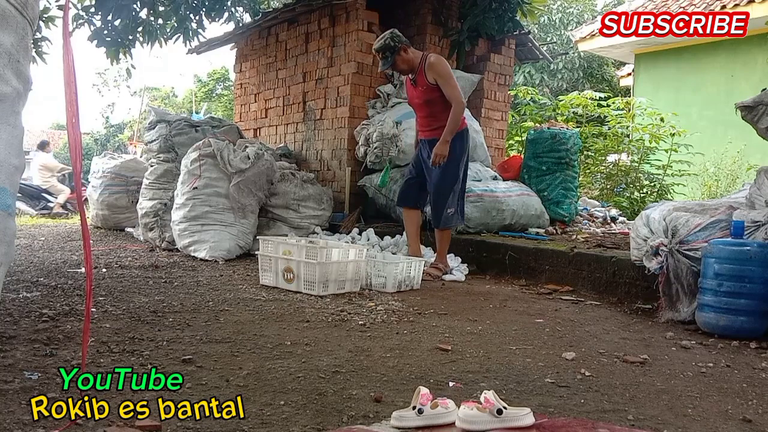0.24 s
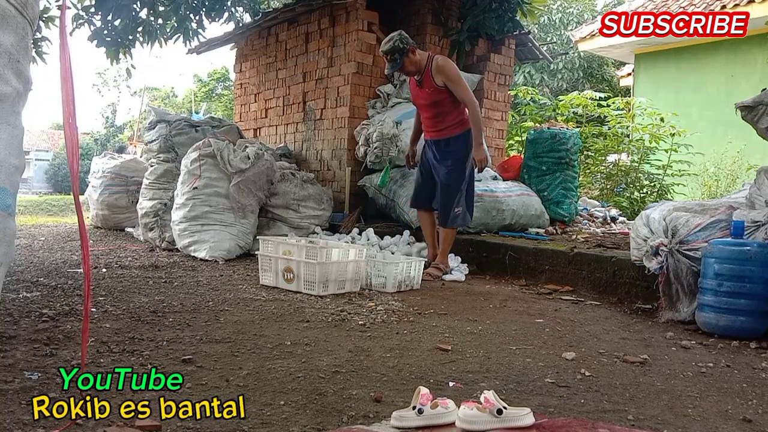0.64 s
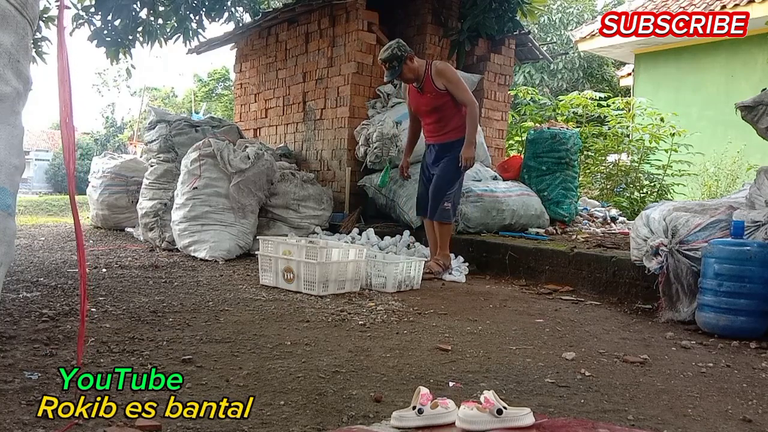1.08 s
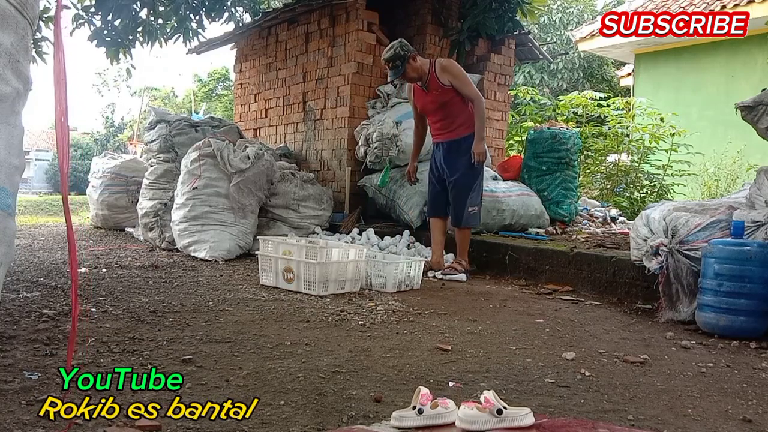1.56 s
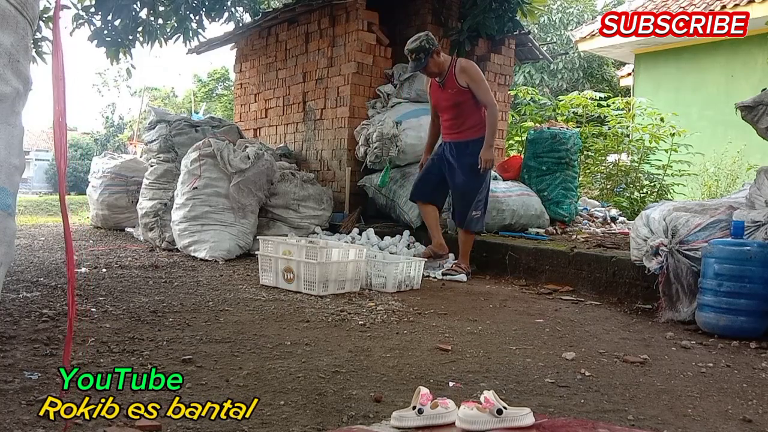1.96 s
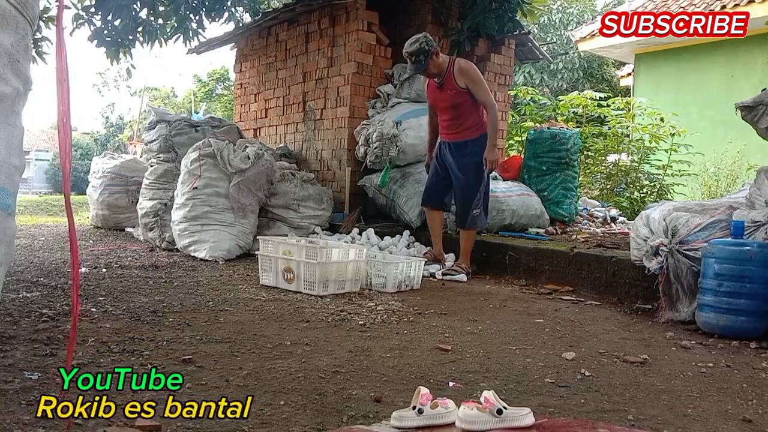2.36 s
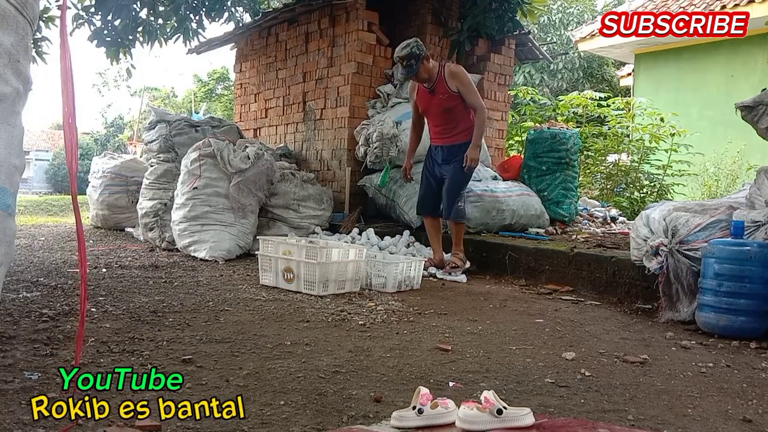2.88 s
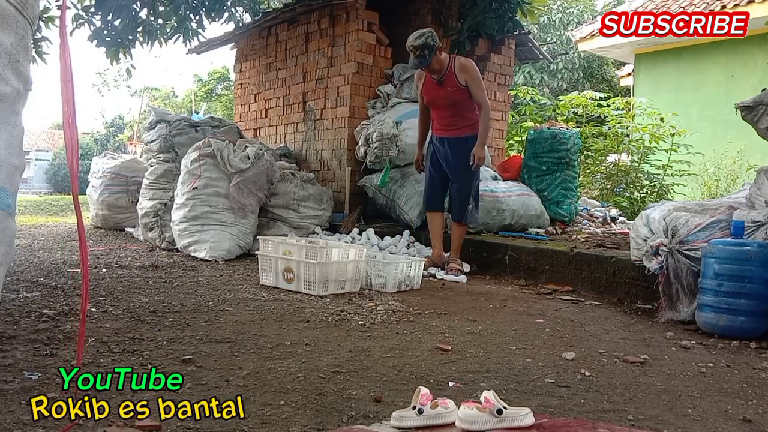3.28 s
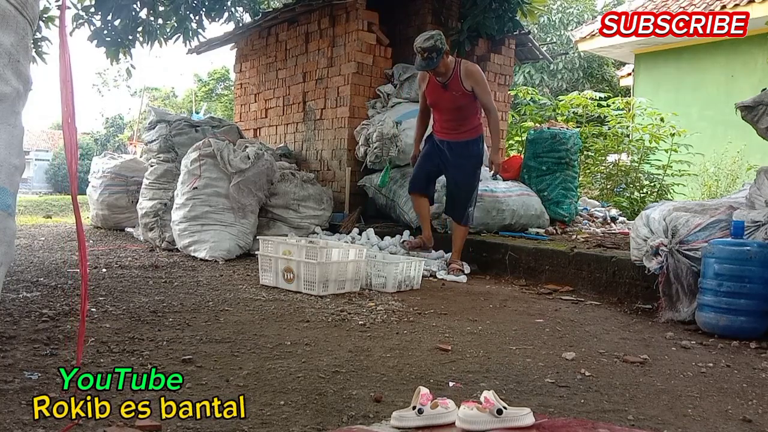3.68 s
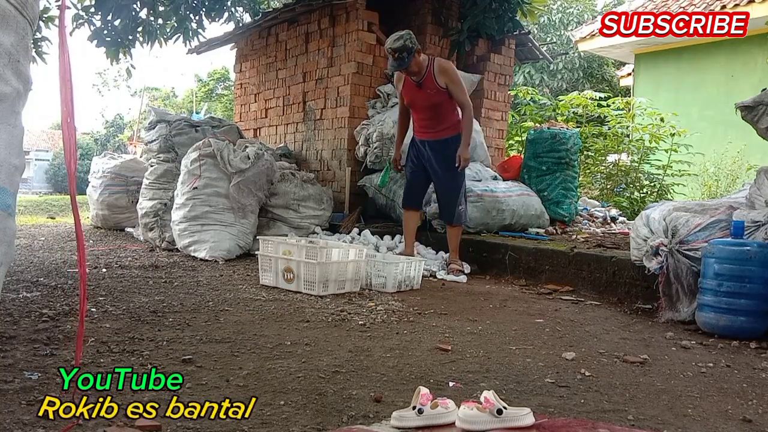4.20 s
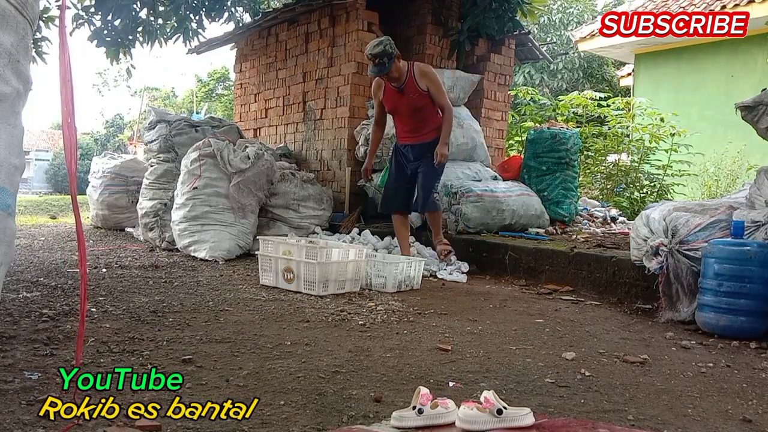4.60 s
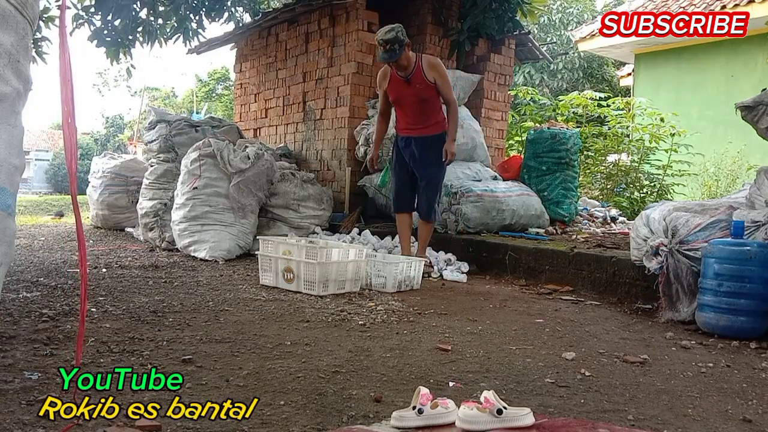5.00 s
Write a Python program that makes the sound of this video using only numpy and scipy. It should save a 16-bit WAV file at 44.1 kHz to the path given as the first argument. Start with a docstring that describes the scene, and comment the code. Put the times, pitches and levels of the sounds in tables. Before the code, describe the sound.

Repeated footsteps crush empty plastic bottles in sharp, crackling bursts in an open yard, with a faint pulsing engine hum.

```python
"""Empty plastic bottles are trampled flat in an open yard; a wall returns short echoes.
From the start a small engine idles far off, slowly fading, over a murmur of air and traffic.
Each tread buckles the bottle walls in sharp snaps over dense crackle; the squeezed air groans.
From 0.9 s, between treads, bottles draw air back in with dull hoots.
The hardest snap comes at 2.9 s, the last burst near 5 s."""
import sys
import numpy as np
from scipy import signal
from scipy.fft import rfft, irfft
from scipy.io import wavfile
from scipy.ndimage import uniform_filter1d, minimum_filter1d

SR = 44100
rng = np.random.default_rng(int(sys.argv[2]) if len(sys.argv) > 2 else 0)


def waveform_to_disk(signal):
    """Save audio, clipped to [-1, 1], as 16-bit WAV at the path in sys.argv[1]."""
    frames = np.transpose(np.atleast_2d(signal))
    scaled = np.clip(frames, -1, 1) * 32767
    samples = np.round(scaled).astype(np.int16)
    wavfile.write(sys.argv[1], SR, samples)


N = 231170

# wall buckles: (time [s], panel level [dB], panel pitch [Hz], crack level [dB], crack spectral peak [Hz])
BUCKLES = [(0.015, -39, 1400, -66, 4170), (0.039, -42, 1390, -34, 4220), (0.068, -25, 740, -39, 3830),
           (0.106, -22.5, 590, -21.5, 3860), (0.142, -27.5, 750, -22, 3820),
           (0.153, -34, 1350, -20.5, 3450), (0.166, -18.5, 1590, -24, 3610), (0.191, -13, 736, -16, 4540),
           (0.216, -9.5, 694, -21.5, 3340), (0.239, -18, 1080, -14.5, 3770),
           (0.293, -37.5, 1440, -28.5, 4000), (0.303, -41, 950, -28, 3870), (0.344, -25.5, 1340, -30, 4520),
           (0.359, -11, 670, -13.5, 3950), (0.374, -12.5, 1770, -20, 4590), (0.384, -18, 1400, -32, 3780),
           (0.429, -10.5, 1340, -40, 3840), (0.442, -21.5, 703, -19.5, 3660),
           (0.614, -29.5, 1830, -24, 3870), (0.744, -31, 1550, -25, 4160),
           (0.753, -19.5, 1600, -17.5, 4310), (0.772, -18, 1510, -16, 5030), (0.795, -13, 750, -9, 4200),
           (0.808, -12, 1260, -13, 3840), (0.819, -16, 890, -10, 3960), (0.837, -27, 735, -45, 4250),
           (0.87, -28.5, 710, -22, 4300), (0.977, -43, 1080, -40.5, 3850), (1.021, -43, 1200, -50, 3420),
           (1.093, -33, 1100, -37.5, 4200), (1.118, -19.5, 1124, -37, 3530),
           (1.154, -26.5, 1880, -30, 4800), (1.176, -13.5, 1650, -22, 4290),
           (1.196, -9.5, 1770, -15.5, 3850), (1.225, -16.5, 1650, -18, 3600),
           (1.237, -11.5, 840, -25, 3760), (1.25, -2, 940, -12.5, 3270), (1.373, -46, 1185, -44, 3420),
           (1.589, -23, 1110, -24, 3110), (1.634, -35, 1080, -62, 3390), (1.662, -27, 1110, -28.5, 3100),
           (1.732, -46, 1830, -42.5, 3240), (1.781, -20, 1390, -31.5, 3280),
           (1.842, -26.5, 1280, -36, 3920), (1.848, -18.5, 1660, -36, 3940),
           (1.877, -25.5, 1150, -35, 3540), (1.923, -26, 1320, -19.5, 3630), (1.963, -20, 1430, -26, 3700),
           (1.97, -14.5, 1410, -29, 3880), (1.98, -6.5, 1800, -12, 4360), (1.987, -17, 860, -47, 3170),
           (2.038, -16, 1870, -24.5, 4310), (2.068, -22.5, 1890, -18.5, 4600),
           (2.087, -14, 1410, -56, 3970), (2.311, -21, 620, -43, 3840), (2.319, -24, 616, -21.5, 4150),
           (2.35, -10, 1530, -22, 4290), (2.361, -10, 1610, -15, 3930), (2.4, -30, 716, -44, 3810),
           (2.419, -10, 714, -16, 3440), (2.437, -8.5, 1640, -32, 3730), (2.47, -26, 797, -23, 3700),
           (2.486, -5.5, 1690, -13.5, 4220), (2.5, -17, 706, -25.5, 3030), (2.525, -22, 890, -22.5, 4340),
           (2.535, -14.5, 1570, -38, 3730), (2.566, -20, 1390, -26, 3800), (2.607, -32.5, 620, -35, 3980),
           (2.629, -29.5, 1210, -35, 4150), (2.649, -18.5, 950, -64, 3310), (2.669, -20.5, 900, -35, 3140),
           (2.739, -25, 690, -36, 3780), (2.751, -10.5, 896, -20.5, 3900), (2.785, -17.5, 1630, -22, 7150),
           (2.822, -22, 1640, -17, 3660), (2.855, -49, 1350, -35, 4020), (2.875, -15.5, 1400, -19.5, 4100),
           (2.895, -10.5, 1820, -19, 3000), (2.919, -5.5, 1590, -12, 4240), (2.926, 1.5, 788, 2, 3600),
           (2.938, -8.5, 1580, -14, 4150), (2.947, -13, 1080, -17, 3780), (2.959, -11.5, 750, -19, 3550),
           (2.968, -7, 1470, -9.5, 3640), (2.982, -14, 1460, -11.5, 4000), (3.008, -24.5, 668, -14, 3860),
           (3.049, -9, 1710, -19, 3410), (3.068, -30.5, 1150, -18, 3650), (3.187, -30.5, 1320, -17.5, 4300),
           (3.204, -32.5, 715, -18.5, 4050), (3.218, -13.5, 730, -16, 3250), (3.229, -16, 690, -18, 3640),
           (3.251, -11.5, 650, -8.5, 3720), (3.269, -14, 1040, -43, 3770), (3.277, -23, 697, -19, 3300),
           (3.292, -21, 1020, -29, 3660), (3.318, -21.5, 790, -23.5, 3220), (3.338, -15, 1020, -12.5, 3420),
           (3.349, -14, 1030, -42, 3360), (3.382, -37, 980, -21, 4000), (3.396, -33.5, 1190, -17.5, 3220),
           (3.409, -29, 1290, -20.5, 3500), (3.443, -10, 730, -13, 4150), (3.451, -13.5, 606, -17.5, 3650),
           (3.469, -13.5, 1030, -19, 3760), (3.484, -9.5, 1240, -15.5, 4060),
           (3.496, -16.5, 790, -33, 3900), (3.509, -14.5, 1140, -12, 3560), (3.523, -20, 1000, -36, 2970),
           (3.547, -10.5, 1670, -13, 3100), (3.557, -13.5, 1500, -10.5, 3050), (3.574, -21, 638, -18, 4800),
           (3.657, -20, 1290, -19.5, 3470), (3.674, -19, 730, -51, 4050), (3.71, -25, 1420, -34.5, 3100),
           (3.856, -40.5, 1110, -63, 3110), (3.873, -38, 1120, -54, 3210), (3.902, -16.5, 1670, -17, 3830),
           (3.92, -19, 730, -39, 2800), (3.939, -21.5, 1210, -43, 4720), (3.96, -20, 1370, -16, 6800),
           (3.971, -22.5, 614, -22, 3630), (4.006, -20, 1500, -19, 3120), (4.017, -7, 1560, -18, 4100),
           (4.045, -12.5, 1570, -21, 3160), (4.069, -11.5, 730, -17.5, 3600),
           (4.086, -10, 1640, -10.5, 2820), (4.109, -15.5, 1240, -41, 4360), (4.119, -17, 1360, -16, 3870),
           (4.135, -18.5, 1540, -29, 3360), (4.153, -26, 810, -13.5, 4140), (4.17, -9, 1230, -15.5, 3240),
           (4.184, -12.5, 660, -20.5, 3710), (4.206, -16.5, 1560, -17.5, 3510),
           (4.234, -12.5, 1250, -15.5, 3770), (4.256, -11.5, 1060, -20.5, 3800),
           (4.269, -24.5, 1060, -23, 3640), (4.307, -18.5, 666, -21, 4300), (4.335, -24.5, 910, -34, 4140),
           (4.363, -16.5, 840, -25, 4160), (4.387, -21, 676, -25.5, 3550), (4.399, -24, 690, -21, 4670),
           (4.421, -10, 1550, -17.5, 3860), (4.455, -12.5, 797, -20, 3400), (4.477, -18.5, 1650, -22, 4740),
           (4.5, -17.5, 2200, -13.5, 4170), (4.534, -15, 780, -13, 4160), (4.549, -15, 980, -11.5, 3660),
           (4.557, -0.5, 1580, -21, 4690), (4.571, -14, 650, -40, 4240), (4.592, -9.5, 810, -11, 3350),
           (4.605, -10.5, 770, -36, 3330), (4.617, -13.5, 627, -16, 3650), (4.643, -5.5, 1046, -11.5, 3400),
           (4.66, -21, 1470, -30, 3740), (4.678, -34, 1120, -24.5, 4240), (4.713, -33.5, 586, -49, 2800),
           (4.778, -43, 1450, -65, 3300), (4.807, -47, 595, -45.5, 3880), (4.844, -56, 637, -49, 3930),
           (4.958, -24.5, 764, -41, 3500), (4.972, -20.5, 746, -25, 3580), (4.99, -9, 1580, -21, 3970),
           (4.996, -10.5, 920, -16.5, 3350), (5.011, -19, 1560, -10, 3770), (5.025, -19, 894, -15.5, 3280),
           (5.037, -16.5, 2080, -25, 4260), (5.07, -38, 920, -26, 3630), (5.113, -21.5, 1550, -28.5, 3400),
           (5.146, -17.5, 860, -45, 3220), (5.157, -25, 780, -29, 3170), (5.23, -27, 766, -34, 3600)]
# foot crushes: (start [s], length [s], panel crackle [dB], crease crackle [dB], air cavity [dB])
TREADS = [(0.062, 0.041, -54, -61, -44.5), (0.103, 0.14, -35.5, -46.5, -58.5),
          (.355, 0.044, -30.5, -37.5, -44.5), (0.631, 0.027, -56.5, -57, -71),
          (0.763, 0.077, -22.5, -34, -29.5), (0.856, 0.079, -43.5, -56, -37.5),
          (0.682, 0.067, -64, -73.5, -59), (0.957, 0.11, -64, -66.5, -62), (1.045, 0.1, -48, -65, -54.5),
          (1.16, 0.11, -33, -48.5, -48.5), (1.588, 0.079, -50.5, -53, -66.5), (1.78, 0.16, -54.5, -64, -79),
          (1.92, 0.17, -37.5, -49, -85), (2.285, 0.038, -41, -67, -43.5), (2.316, 0.089, -28, -40.5, -27),
          (2.425, .15, -37, -48.5, -44.5), (2.655, 0.024, -42.5, -56, -42.5), (2.743, 0.017, -31, -57, -42),
          (2.887, .11, -35, -45, -33), (3.0, 0.064, -35.5, -45.5, -42), (3.206, 0.067, -29.5, -38.5, -30.5),
          (3.348, 0.23, -32, -43.5, -37), (3.648, 0.035, -40, -53, -43.5), (3.839, 0.037, -60, -80, -69),
          (3.909, 0.41, -34, -48.5, -36), (4.062, 0.24, -33, -52, -37.5), (4.361, 0.15, -34, -45, -37.5),
          (4.537, 0.11, -27, -33.5, -35), (4.968, 0.056, -28, -52.5, -41.5), (5.086, 0.1, -51, -56.5, -54),
          (5.226, .03, -41.5, -61, -68)]
# crackle colour through the microphone: (frequency [Hz], level [dB])
CRACKLE_SPECTRUM = [(750, -1), (1000, -4), (1600, -1), (2650, -16), (3700, -9.5), (4800, -12.5),
                    (5900, -19.5), (7000, -19), (9600, -28), (15000, -32)]
# air drawn back in: (start [s], length [s], pitch [Hz], level [dB])
NECK_HOOTS = [(0.917, 0.065, 406, -40.5), (1.054, 0.026, 408, -42), (2.111, 0.063, 428, -48),
              (2.155, 0.047, 407, -53), (3.089, 0.12, 364.3, -45.5), (4.694, 0.061, 449, -45.5),
              (4.79, 0.092, 453.4, -51.5)]
# echo decay: (frequency [Hz], T60 [s])
ECHO_DECAY = [(300, 0.12), (1000, 0.13), (4000, 0.046), (12000, 0.14)]
# idling engine: (time [s], firings so far [count])
FIRING_COUNT = [(-.026, 0), (.671, 10), (1.022, 15), (2.263, 33), (2.741, 40), (3.742, 55), (4.781, 70),
                (5.268, 77)]
# exhaust pipe resonances: (frequency [Hz], gain [dB], T60 [s])
EXHAUST_MODES = [(80, -9.5, 0.07), (105, -8, 0.14), (126, -2, 0.14), (137, -2, 0.1)]
# air and traffic: (frequency [Hz], level [dB])
YARD_SPECTRUM = [(25, -24.5), (60, -10), (137, -11), (218, -17), (700, -22), (1600, -39.5), (3700, -33),
                 (9000, -53), (14000, -66.5)]


def snaps(rise_s=0.00024, slip_s=0.0044, panel_cycles=15.1, body_db=5.5, mic_peak_db=5,
          sizzle_hz=7080, sizzle_db=-5):
    """A ragged slip rings a panel and gives a bright crack, coloured near 3.8 kHz by the microphone."""
    size = 2048
    out = np.zeros(N + size)
    t = np.arange(size) / SR
    slip = (1 - np.exp(-t / rise_s)) ** 2 * np.exp(-(t / slip_s) ** 1.67)
    for time_s, panel_db, panel_hz, crack_db, peak_hz in BUCKLES:
        rough, fine = rng.standard_normal((2, size))
        jerks = rough ** 3 * slip  # a few strong among many weak
        panel = ring(jerks, panel_hz, panel_cycles / panel_hz)
        panel += from_db(body_db) * band(jerks, panel_hz / 3.2, panel_hz * 1.42)  # nearby panels
        panel = band(panel, panel_hz / 2, panel_hz * 3.13)  # soft panel: little bass or treble
        panel = band(panel, panel_hz / 2.6, 16000)
        spray = band(coloured(fine, CRACKLE_SPECTRUM), 2600, 20000) * slip
        top_hz = 19000 * from_db(0.32 * min(crack_db, 0))  # weak slips are duller
        spray = band(spray, 2000, max(top_hz, 4000))
        crack = spray + from_db(mic_peak_db) * band(spray, peak_hz / 1.12, peak_hz * 1.12)
        film_gain = from_db(sizzle_db) * fine[1] ** 2  # thin film rings high, varying by snap
        crack += film_gain * band(spray, sizzle_hz / 1.06, sizzle_hz * 1.06)
        i = round(time_s * SR)
        out[i:i + size] += from_db(panel_db) * panel / np.abs(panel).max()
        out[i:i + size] += from_db(crack_db) * crack / np.abs(crack).max()
    return out[:N]


def crackle(rate_per_s, spread_db, band_hz, ring_cycles):
    """Tiny random buckles, dealt to 16 resonances across the band; rms 1."""
    sizes = from_db(spread_db * np.minimum(rng.exponential(1, N), 4))
    signs = rng.choice([-1, 1], N)
    clicks = sizes * signs * (rng.random(N) < rate_per_s / SR)
    mode = rng.integers(0, 16, N)
    pitches_hz = np.geomspace(*band_hz, 16)
    rings = sum(ring(clicks * (mode == k), hz, ring_cycles / hz) * hz for k, hz in enumerate(pitches_hz))
    return rms_one(band(coloured(rings, CRACKLE_SPECTRUM), *band_hz))


def tread_gain(column, rise_db_per_s=1516, fall_db_per_s=352):
    """Each crush swells fast, holds and dies away."""
    t, power = np.arange(N) / SR, 0
    for row in TREADS:
        start_s, length_s = row[:2]
        early_s = np.maximum(start_s - t, 0)
        late_s = np.maximum(t - start_s - length_s, 0)
        level_db = row[column] - rise_db_per_s * early_s - fall_db_per_s * late_s
        power += from_db(level_db) ** 2
    return np.sqrt(power)


def flurry_gain(column, gain_db=-20.5, t60_s=0.1):
    """Each snap sets off a decaying flurry of crackle."""
    kicks = np.zeros(N)
    for row in BUCKLES:
        kicks[round(row[0] * SR)] += from_db(row[column] + gain_db)
    pole = from_db(-60 / (t60_s * SR))
    return signal.lfilter([1], [1, -pole], kicks + 1e-18)


def crumpling():
    """Panels and creases crackle underfoot and after snaps; harder treading is brighter."""
    panel_gain = np.hypot(tread_gain(column=2), flurry_gain(column=1))
    crease_gain = np.hypot(tread_gain(column=3), flurry_gain(column=3))
    crinkle_gain = from_db(-1) * crease_gain ** 1.222
    panels = crackle(rate_per_s=1200, spread_db=4.7, band_hz=(555, 2526), ring_cycles=27.5)
    creases = crackle(rate_per_s=3000, spread_db=2.6, band_hz=(2195, 5780), ring_cycles=7.7)
    crinkle = crackle(rate_per_s=5000, spread_db=5.4, band_hz=(5060, 17000), ring_cycles=32)
    return panel_gain * panels + crease_gain * creases + crinkle_gain * crinkle


def groans():
    """Squeezed air groans in cavities of many sizes; feet thump with a low rumble."""
    cavities = crackle(rate_per_s=300, spread_db=3, band_hz=(307, 516), ring_cycles=22)
    thumps = crackle(rate_per_s=400, spread_db=3, band_hz=(170, 300), ring_cycles=6)
    return tread_gain(column=4, fall_db_per_s=260) * (cavities + from_db(-15.5) * thumps)


def hoots(t60_s=0.27):
    """Air crosses a bottle neck: noise in one narrow resonance, swelling and fading."""
    out = np.zeros(N)
    for start_s, length_s, hz, level_db in NECK_HOOTS:
        i, size = round(start_s * SR), round(length_s * SR)
        breath = rng.standard_normal(8192)
        tone = ring(breath, hz, t60_s)[2048:2048 + size]  # skip the build-up
        out[i:i + size] += from_db(level_db) * rms_one(tone * np.sqrt(np.hanning(size)))
    return out


def echoes(x, first_s=0.0037, gain_db=-10):
    """Scattered returns from wall, sacks and ground: a noise tail, one decay per octave."""
    t = np.arange(SR // 2) / SR
    noise, tail = rng.standard_normal(len(t)), 0
    for low_hz in 200 * 2 ** np.arange(7):
        octave = band(noise, low_hz, min(2 * low_hz, 0.45 * SR))
        t60_s = at_hz(ECHO_DECAY, low_hz * np.sqrt(2))
        tail += octave * from_db(-60 * t / t60_s)
    tail *= t > first_s
    return from_db(gain_db) * signal.fftconvolve(x, tail / np.linalg.norm(tail))[:N]


def engine(gain_db=-51, fade_db_per_s=2.75, jitter_db=1.5, band_hz=(72, 240)):
    """Each firing pushes softly, a little unevenly, into the exhaust pipe; the engine draws away."""
    t = np.arange(N) / SR
    count = np.floor(np.interp(t, *np.transpose(FIRING_COUNT)))
    fired = np.diff(count, prepend=count[0]) > 0
    kicks = fired * from_db(jitter_db * rng.standard_normal(N))
    pushes = np.convolve(kicks, np.hanning(200) / 100)[:N]
    pipe = sum(from_db(db) * ring(pushes, hz, t60_s) for hz, db, t60_s in EXHAUST_MODES)
    return from_db(gain_db - fade_db_per_s * t) * band(band(pipe, *band_hz), *band_hz)


def yard(rms_db=-68):
    """Steady murmur of air and traffic."""
    return from_db(rms_db) * coloured(rng.standard_normal(N), YARD_SPECTRUM)


def ring(x, hz, t60_s):
    """Resonator: a unit click starts a decaying sine of height 1."""
    radius = from_db(-60 / (t60_s * SR))
    step_rad = 2 * np.pi * hz / SR
    return signal.lfilter([0, np.sin(step_rad)], [1, -2 * radius * np.cos(step_rad), radius ** 2],
                          x + 1e-18)


def band(x, low_hz, high_hz):
    """Band-pass."""
    return signal.sosfilt(signal.butter(2, [low_hz, high_hz], "band", fs=SR, output="sos"), x)


def coloured(x, spectrum):
    """Filter by a spectrum table; rms 1."""
    hz = np.maximum(np.fft.rfftfreq(len(x), 1 / SR), 1)
    return rms_one(irfft(rfft(x) * from_db(at_hz(spectrum, hz)), len(x)))


def at_hz(table, hz):
    """Interpolate on a log-frequency axis."""
    table_hz, values = np.transpose(table)
    return np.interp(np.log(hz), np.log(table_hz), values)


def rms_one(x):
    """Scale to unit rms."""
    return x / np.sqrt(np.mean(x ** 2) + 1e-20)


def from_db(db):
    """Decibels to gain."""
    return 10 ** (np.asarray(db) / 20)


def scene():
    """Bottles and their echoes over engine and yard; mono."""
    bottles = snaps() + crumpling() + groans() + hoots()
    bottles += echoes(bottles)
    bass_cut = signal.butter(2, 240, "high", fs=SR, output="sos")  # small bottles radiate little bass
    return (signal.sosfilt(bass_cut, bottles) + engine() + yard())[None]


def record(dry):
    """Fast peak limiter, then a steep low-pass."""
    ceiling, window_samples, stop_hz = 0.42, 129, 16500
    gain = 1 / np.maximum(np.abs(dry[0]) / ceiling, 1)
    gain = uniform_filter1d(minimum_filter1d(gain, window_samples), window_samples)
    return signal.sosfilt(signal.cheby2(12, 70, stop_hz, fs=SR, output="sos"), dry * gain)


dry = scene()
out = record(dry)
waveform_to_disk(out)
```